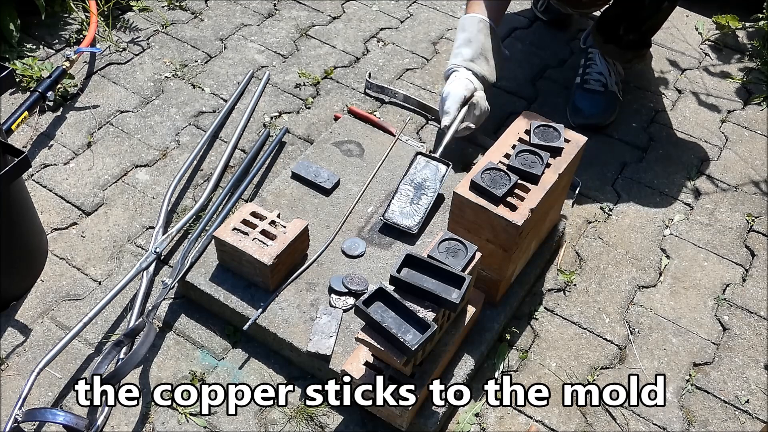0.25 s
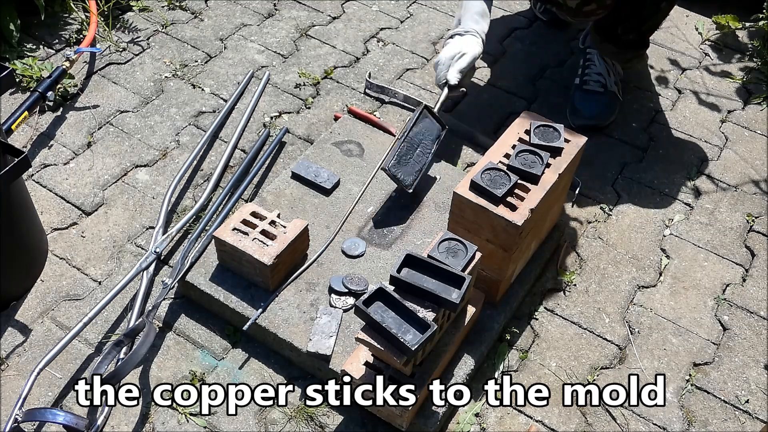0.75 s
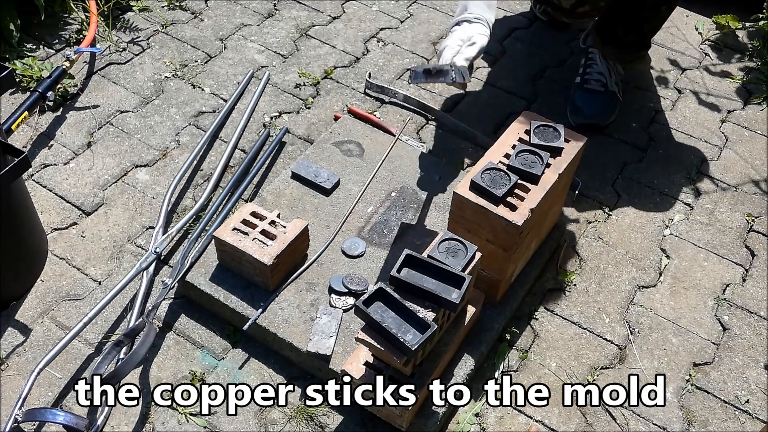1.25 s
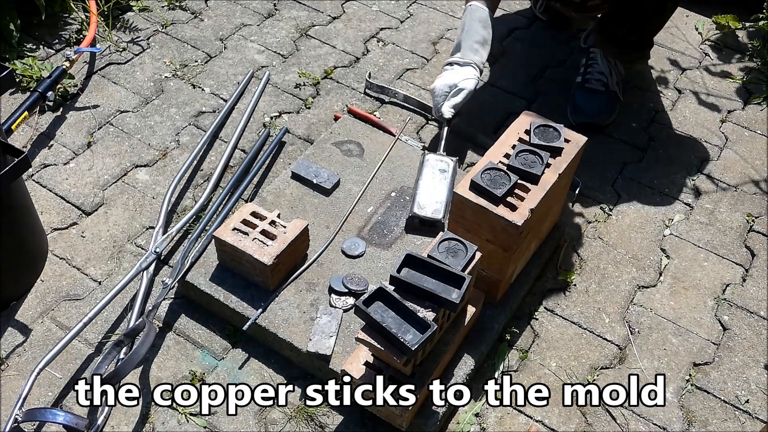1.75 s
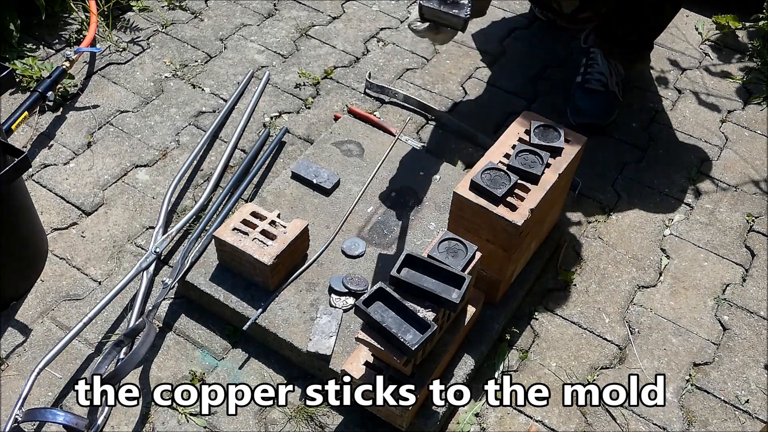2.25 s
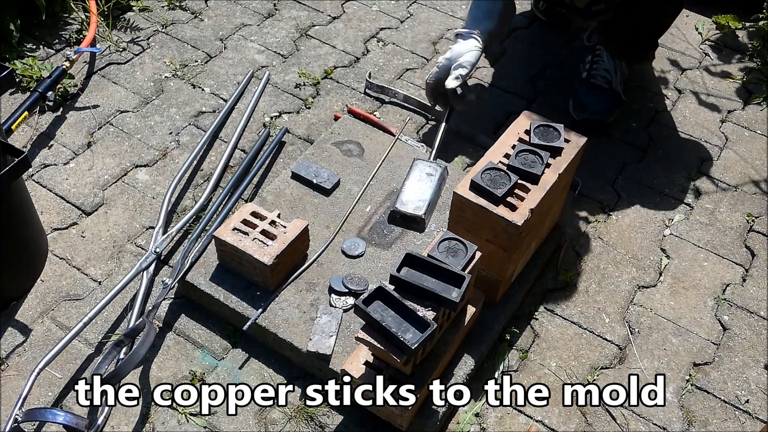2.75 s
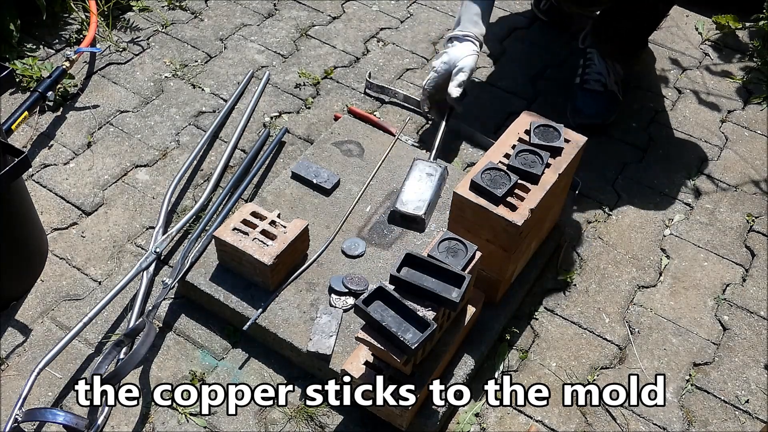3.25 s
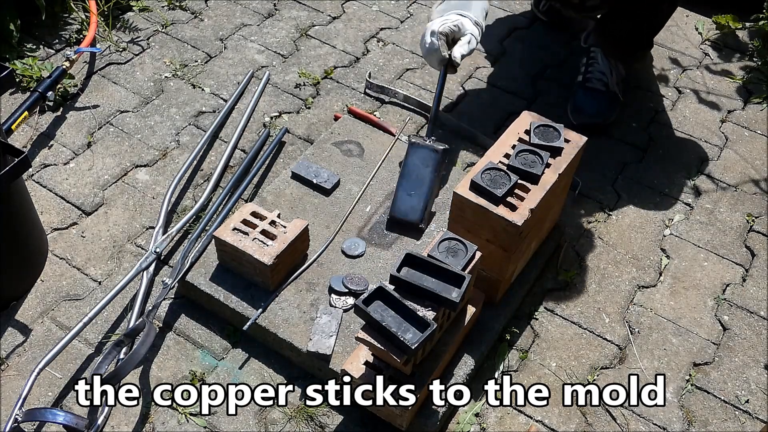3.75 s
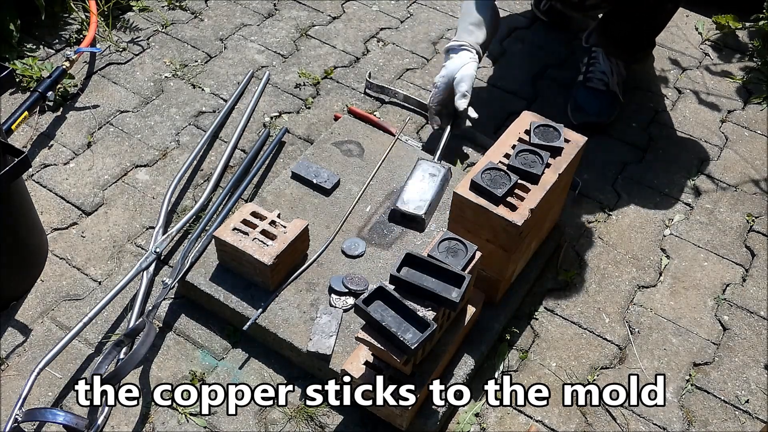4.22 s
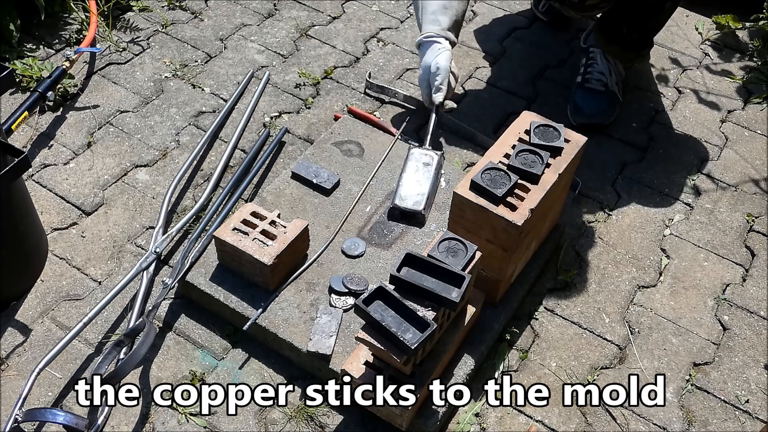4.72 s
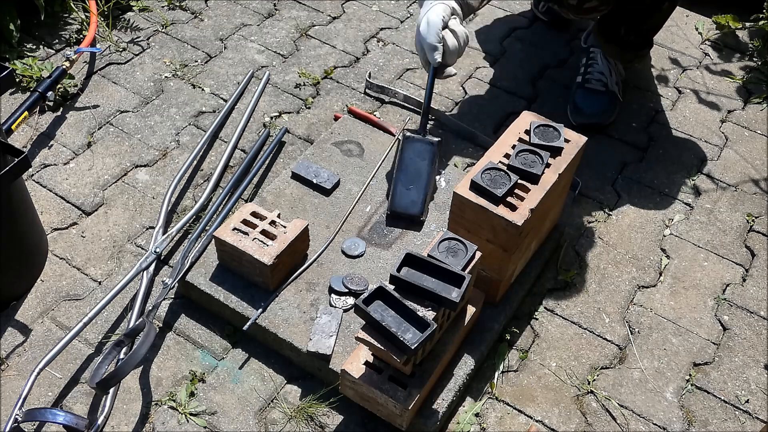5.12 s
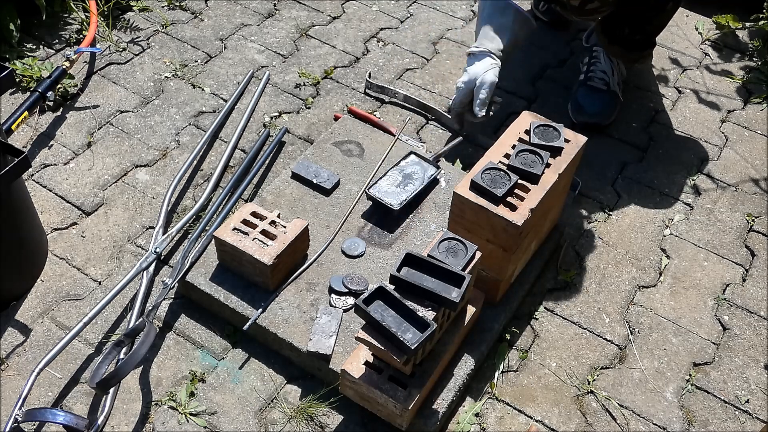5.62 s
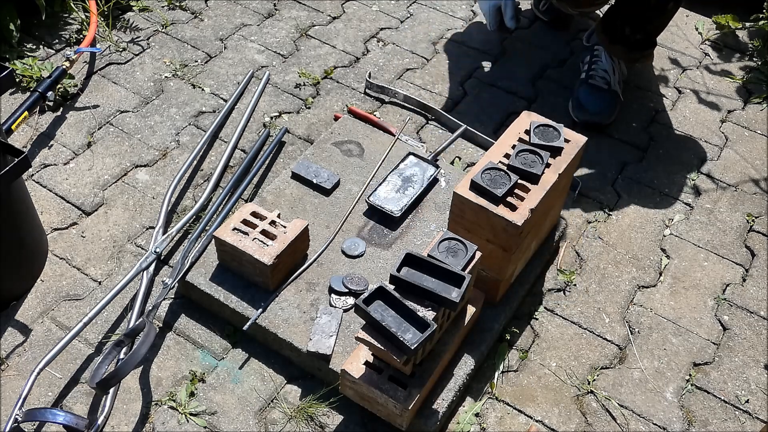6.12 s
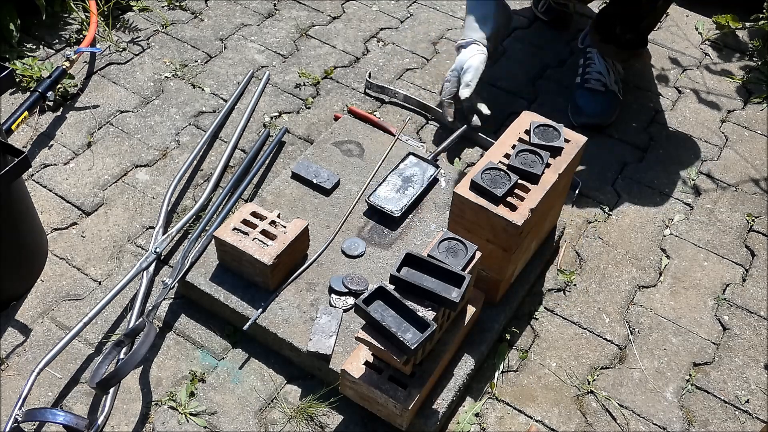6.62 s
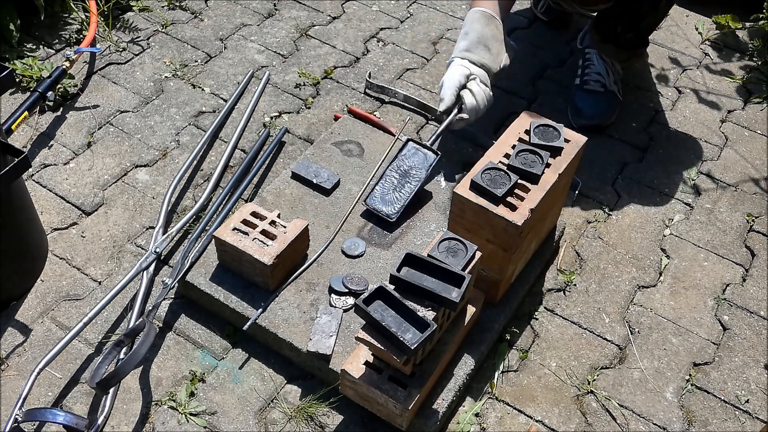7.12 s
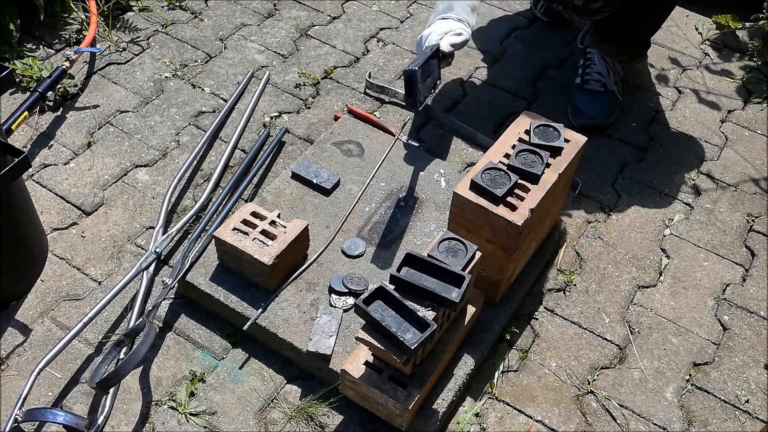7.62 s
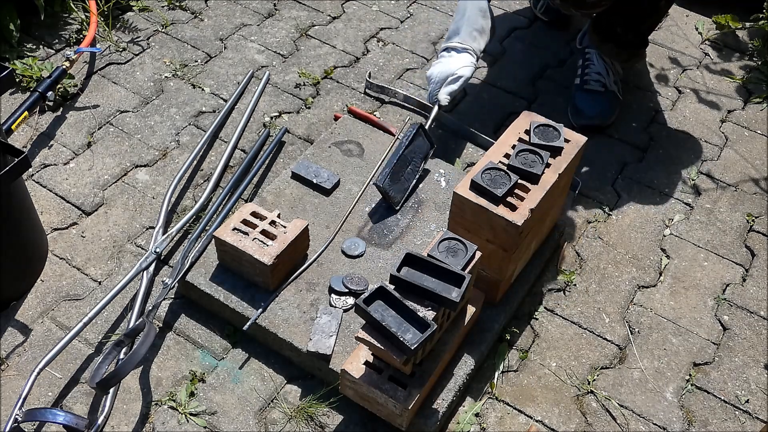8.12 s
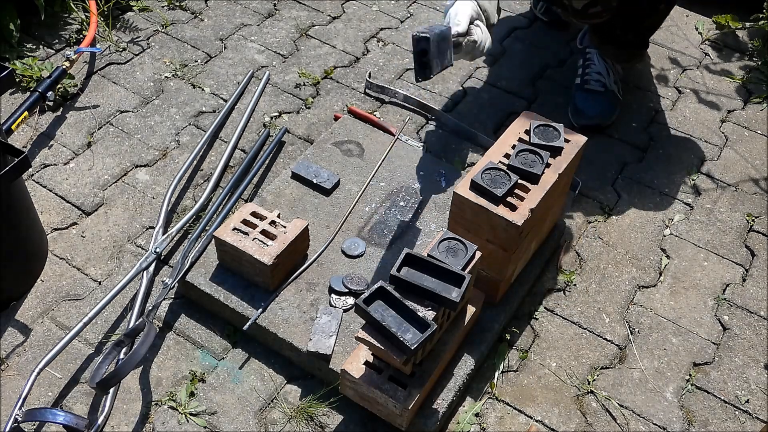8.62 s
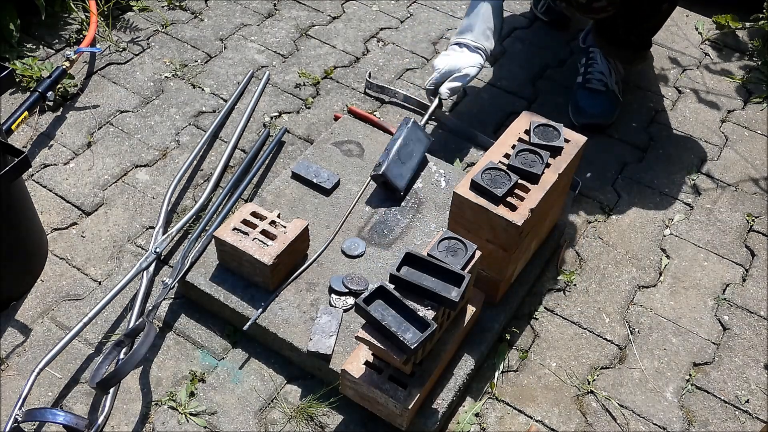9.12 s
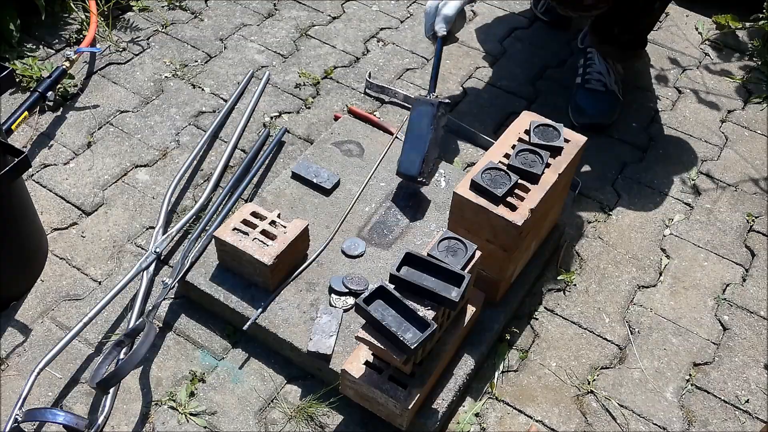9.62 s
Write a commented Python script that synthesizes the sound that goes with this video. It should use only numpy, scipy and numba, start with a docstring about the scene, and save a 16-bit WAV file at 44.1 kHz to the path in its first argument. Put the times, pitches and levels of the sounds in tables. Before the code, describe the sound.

Over the steady roar and hiss of a gas burner outdoors, a steel mould hits concrete three times with hard, quickly fading clanks. A soft scrape and a cluster of lighter knocks follow, then two more heavy slams and a small, high ring as the copper bar inside frees itself. Each hard hit has a brief echo and pushes the overall volume down for a moment before it creeps back.

```python
"""In a paved yard, a gas burner roars into a melting furnace while a steel ingot mould is knocked
and dragged on a concrete slab. The swirling flame makes a low roar, and the gas jet makes a hiss
coloured by the burner tube. Each knock rings the steel; flat landings add a hollow clonk. Near the
end a copper bar comes loose in the mould with a thin, high ring. Hard knocks make an automatic
gain control turn everything down, and the volume then creeps back."""
import sys
import numpy as np
from scipy import signal
from scipy.fft import rfft, irfft, next_fast_len
from scipy.io import wavfile
from scipy.ndimage import minimum_filter1d
from numba import njit

SR = 44100
rng = np.random.default_rng(int(sys.argv[2]) if len(sys.argv) > 2 else 0)


def materialize(psi):
    """Save the field psi as 16-bit PCM at rate SR to the path in sys.argv[1].

    A 1-D psi becomes a single channel; in a 2-D psi each row is a channel.
    """
    bounded = np.clip(np.atleast_2d(psi).T, -1, 1)
    quanta = np.round(bounded * 32767).astype(np.int16)
    wavfile.write(sys.argv[1], SR, quanta)


N = 434826

# How hard the burner runs: time_s, flame_db, jet_db
BURNER_LEVELS = [(0, -26, -45), (2, -26.5, -45), (4, -25.5, -44), (6, -25.5, -44), (8, -26.5, -44.5),
                 (8.8, -25, -44.5), (9.4, -29, -47), (9.86, -27, -46.5)]
# Tone of the flame's roar and of the jet's hiss: pitch_hz, relative_db
FLAME_TONE = [(25, -21.5), (55, -30), (100, -10.5), (140, 0.5), (200, -4.5), (380, -5), (500, -10),
              (700, -26), (1100, -28), (1400, -38.5), (2000, -57.5)]
JET_TONE = [(900, -11), (1800, -11.5), (2400, -2.5), (3500, -6.5), (4400, -14.5), (5600, -10.5),
            (7000, -10.5), (7700, -24), (8400, -8.5), (11500, -11), (13000, -22), (15200, -69),
            (15800, -46)]
# Peaks and dips in the flame's roar from sound reflecting off the ground: pitch_hz, width_hz, gain_db
GROUND_REFLECTION_PEAKS = [(231.5, 9.1, -16.5), (245.6, 20, 5.5), (278.5, 29, -7.5), (714, 15.3, -12),
                           (741.4, 31.5, 9), (1487, 60, 16)]
# Peaks and dips the burner tube adds to the hiss: pitch_hz, width_hz, gain_db
TUBE_PEAKS = [(2174, 162, 14), (2596, 178, 13.5), (2835, 153, -6), (3100, 150, 11.5), (3754, 176, 11),
              (4630, 6.8, 19.5), (5326, 310, 7), (5870, 88, 10.5), (6340, 200, 7.5), (8860, 350, 3.5),
              (9600, 110, 6.5), (12600, 200, -2), (13500, 250, 6), (14000, 300, -29)]
# How much louder the burner is on the left: pitch_hz, gain_db
LEFT_LOUDER = [(60, 1), (130, -0.5), (290, 1), (640, 3), (1410, 4), (3100, 4), (6820, -0.5), (15000, 1.5)]
# How far the burner's wave is ahead on the left: pitch_hz, phase_radians
LEFT_AHEAD = [(0, -0.37), (600, 0.44), (2930, -0.52), (4050, 0.2), (9820, 0.015), (11800, -0.8),
              (12500, -0.1), (16100, -0.1)]
# Scattered burner sound beside the direct sound: pitch_hz, relative_db
SCATTERED_SHARE = [(30, -10), (80, -45), (300, -33), (1000, -8), (3000, -11.5), (8000, -9.5), (15000, -7.5)]

# The mould scraping over the slab: start_s, end_s, level_db, pitch_hz
MOULD_DRAGS = [(0.594, .72, -52, 1640), (4.692, 4.9, -30.5, 1540), (5.156, 5.257, -33.5, 1000)]
# The mould hitting the slab. Slams land on one end, then the other, then bounce; turning it gives
# light taps. Where it lands favours two pitches; how it is held changes the length of the ring.
# start_s, blow_db, pitch_hz, second_hz, second_db, focus_db_per_octave, ring_scale,
# crack_db, clonk_db, clonk_hz (second_db, crack_db and clonk_db are added to blow_db)
MOULD_KNOCKS = [(.612, -30, 1570, 2560, -9, 40, 1.1, -25, -30, 850),
                (.641, -31, 1740, 1285, -2, 40, 0.57, -22, -30, 850),
                (0.695, -30, 1580, 2580, -3, 45, 1.1, -25, -30, 850),
                (1.4061, 3, 2340, 1075, -2.5, 60, .9, -9.5, 2, 885),
                (1.4153, 14, 1330, 2090, -6, 40, 0.47, -13, -5, 900),
                (1.416, 5, 5540, 3200, -3, 40, 0.72, -16, -30, 900),
                (1.4654, -17, 2025, 1230, 4, 40, 0.54, -9, 8, 880),
                (2.4974, 3, 2180, 3130, 5, 77, 0.4, -7.5, -2.5, 810),
                (2.4997, 8, 2110, 5050, 0, 68, 0.47, -11.5, -1, 820),
                (2.579, -14, 1940, 2340, -4, 40, 0.28, -15, -25, 850),
                (3.9643, -4, 2500, 5280, -1, 51, 0.68, -16, -28, 820),
                (3.9645, -3, 1540, 1360, -4, 45, 0.61, -32, -25, 810),
                (3.9662, -6, 2060, 2600, -13, 55, .45, -25, 4.5, 804),
                (4.0432, -13.5, 1040, 1330, -3, 45, 0.66, -20, 0, 924),
                (4.739, -21.5, 1560, 1580, -7, 65, 1.1, -35, -32, 850),
                (5.157, -32, 1040, 1580, -8, 23, 0.51, -11, -3, 850),
                (5.256, -28.5, 1510, 2200, -3, 30, 0.55, -6, 13, 820),
                (5.4304, -15.5, 1030, 1400, -4, 47, 0.9, -17, -6, 850),
                (5.5885, -18.5, 1290, 2170, -2, 45, 0.58, -8.5, -20, 850),
                (5.6296, -13.5, 1280, 2260, -5.5, 50, 0.93, -6.5, 2.5, 740),
                (5.631, -13, 5270, 2450, 3, 52, 0.69, -14, -30, 850),
                (5.732, -9.5, 1280, 2030, -9, 61, 0.66, -15.5, -9, 914),
                (5.8072, -15, 1280, 2230, -12, 62, 0.88, -12, 3, 810),
                (5.847, -36, 2200, 1320, 5, 26, 0.52, -3, -16, 860),
                (7.298, -19, 1472, 2480, -12, 150, 1.1, -26, -30, 850),
                (7.328, -18.5, 1540, 1130, -2, 37, 0.45, -25, -24, 790),
                (7.9051, 3.5, 1060, 2140, -9, 51, 0.77, -13, 7, 870),
                (7.9099, 2.5, 1230, 2200, -4, 47, 0.38, -14, 7, 844),
                (7.963, -23, 1040, 1230, -3, 30, .6, -10, 11, 880),
                (8.857, 1.5, 1110, 5000, -8, 48, 0.79, -8, 6, 874),
                (8.8595, 0, 2090, 1230, 2, 55, 0.55, -22, -2, 820),
                (8.885, -16, 1230, 2430, -6, 20, .6, -12, -1, 850),
                (8.902, -8, 2690, 4300, -24, 120, 1.3, -40, -40, 850),
                (8.9495, -19.5, 1030, 2210, -16, 23, 1, -8.5, 4, 860),
                (9.2796, -7.5, 1440, 3740, -1, 35, 0.23, -11, -53, 850),
                (9.307, -28, 1500, 4400, 6, 28, .4, -3, -20, 850),
                (9.318, -31, 1500, 4300, 0, 20, 0.37, -8, -20, 850)]
# The steel mould's ringing notes: pitch_hz, level_db, ring_s (before ring_scale)
MOULD_NOTES = [(1040, 13.5, 0.014), (1150, -14, 0.028), (1168, 1, 0.036), (1275, 3, 0.08), (1380, 5, 0.035),
               (1460, -10, 0.024), (1474, -0.5, 0.061), (1543, -3.5, 0.067), (1740, 5, 0.04),
               (1900, 6.5, 0.046), (2015, 5, 0.059), (2140, 0, 0.14), (2208, 5.5, 0.044),
               (2264, -12.5, 0.036), (2414, 1.5, 0.051), (2530, 3, 0.052), (2640, -9, 0.17),
               (2850, -2, 0.017), (2950, 4, 0.023), (3250, 6, 0.029), (3540, 1, 0.023), (4130, -5, 0.048),
               (4940, 2, 0.026), (5130, 7, 0.026), (6200, -12, 0.013), (6800, -18, .012)]
# The hollow clonk of a flat landing: multiple_of_clonk_hz, level_db, ring_s (before ring_scale)
CLONK_NOTES = [(.77, -10, 0.024), (1, -2.5, 0.028)]
# Tone of a knock's crack and of its tail in the yard: pitch_hz, relative_db
CRACK_TONE = [(600, -10), (1200, 8), (2400, 11), (3600, 7), (5200, 5), (7500, -1), (10000, -3),
              (16000, -27)]
YARD_TONE = [(500, -31), (1500, 15), (2600, 8), (5000, 1.5), (9000, -7), (12000, -10), (16000, -24)]

# The copper bar coming loose, one row: lift_s, land_s, ring_db, rattle_db
BAR_LIFT = (9.2825, 9.308, -27, -31)
# The bar's ringing notes: pitch_hz, level_db, ring_s (before ring_scale)
BAR_NOTES = [(9082, -8, .04), (9812, -5, .3), (10148, -5, .1), (11297, 0, .16), (11979, -3, .16),
             (13155, -5, .16), (13771, -4, .16), (15597, -8, .14)]
# Tone of the bar chattering in the mould: pitch_hz, relative_db
RATTLE_TONE = [(1000, -24), (2500, -12), (6000, -3), (11000, 0), (16000, -8)]


def from_db(db):
    """Turn decibels into a number to multiply by."""
    return 10 ** (np.asarray(db) / 20)


def rms_one(x):
    """Scale a signal to an average strength of 1."""
    return x / np.sqrt(np.mean(x ** 2) + 1e-20)


def at_hz(points, hz):
    """Read between a table's rows at the given pitches."""
    points = np.array(points, float)
    return np.interp(np.log(hz), np.log(points[:, 0] + 1), points[:, 1])


def drift(rate_hz):
    """A smooth random wander, about 1 in size; a higher rate moves faster."""
    step = 40   # samples per random value
    pole = np.exp(-2 * np.pi * rate_hz * step / SR)
    noise = rng.standard_normal(N // step + 2002)
    slow = signal.lfilter([1], [1, -2 * pole, pole * pole], noise)[2000:]
    return np.interp(np.arange(N) / step, np.arange(len(slow)), rms_one(slow))


def colour(x, tone, peaks=()):
    """Shape a sound with a tone curve plus rounded peaks and dips."""
    size = next_fast_len(len(x))
    hz = np.arange(1, size // 2 + 2) * SR / size
    peaks_db = sum(db / (1 + (2 * (hz - pitch) / width) ** 2) for pitch, width, db in peaks)
    return irfft(rfft(x, size) * from_db(at_hz(tone, hz) + peaks_db), size)[:len(x)]


def swirling_gas(tone, peaks, flutter_db):
    """Noise that flutters as the gas swirls, in a direct and a scattered version."""
    flutter = from_db(flutter_db)
    direct, scattered = (colour(rng.standard_normal(N) * flutter, tone, peaks) for _ in range(2))
    return np.array([direct, scattered]) / np.std(direct)


def burner():
    """The flame roars and the jet hisses, a little to the left; the same slow gusts sway both."""
    time_s, flame_db, jet_db = np.transpose(BURNER_LEVELS)
    t, gust = np.arange(N) / SR, drift(0.75)
    flame = swirling_gas(FLAME_TONE, GROUND_REFLECTION_PEAKS, flutter_db=0.48 * gust + drift(26.5))
    flame *= from_db(np.interp(t, time_s, flame_db))
    flame[0] -= 0.17 * (flame[0] ** 2 - np.mean(flame[0] ** 2))   # troughs get sharper than crests
    jet = swirling_gas(JET_TONE, TUBE_PEAKS, flutter_db=0.6 * (0.7 * gust + drift(30.0)))
    jet *= from_db(np.interp(t, time_s, jet_db))
    size = next_fast_len(N)
    hz = np.arange(1, size // 2 + 2) * SR / size
    direct, scattered = rfft(flame + jet, size)
    scattered *= from_db(at_hz(SCATTERED_SHARE, hz))
    # Each side takes half of the left-right gap in level and phase.
    lean = from_db(at_hz(LEFT_LOUDER, hz) / 2) * np.exp(.5j * at_hz(LEFT_AHEAD, hz))
    return irfft([(direct + scattered) * lean, (direct - scattered) / lean], size)[:, :N]


def drags(bumps=14):
    """Each scrape is a string of small, uneven bumps, given as rows like MOULD_KNOCKS."""
    rows = []
    for start_s, end_s, level_db, pitch_hz in MOULD_DRAGS:
        for when, size in rng.random((bumps, 2)):
            time_s = start_s + when * (end_s - start_s)
            blow_db = level_db + 12 * (size - .5)
            rows.append((time_s, blow_db, pitch_hz, pitch_hz, 0, 60, .8, -16, -30, 850))
    return rows


def struck(starts, strength_db, notes, rise_s, ring_scale=0.86, pitch_scale=1):
    """Blows make notes swell as the force builds, then fade 60 dB in ring_s times ring_scale."""
    pitch, level_db, ring_s = np.transpose(notes)[:, :, None]
    t, out = np.arange(SR // 4) / SR, np.zeros(N + SR)
    gains = from_db(strength_db + level_db[:, 0])
    per_blow = np.ones((len(starts), 1))
    for start, gain, length, tune in zip(starts, gains, ring_scale * per_blow, pitch_scale * per_blow):
        swell = from_db(-60 * t / (length * ring_s)) - from_db(-60 * t / rise_s)
        out[start:start + len(t)] += gain @ (np.sin(2 * np.pi * tune * pitch * t) * swell)
    return out[:N]


def fading(starts, level_db, fade_s):
    """A level that jumps at each start sample, then falls to about a third every fade_s."""
    clicks = np.zeros(N)
    clicks[starts] = from_db(level_db).ravel()
    return signal.lfilter([1], [1, -np.exp(-1 / (fade_s * SR))], clicks + 1e-18)


def mould(crack_s=0.0022):
    """Steel hits concrete with a ring, a clonk and a gritty crack; also returns the tail in the yard."""
    hits = np.vstack([MOULD_KNOCKS, drags()])
    (start_s, blow_db, pitch_hz, second_hz, second_db, focus, ring_scale,
     crack_db, clonk_db, clonk_hz) = hits.T[:, :, None]
    starts = np.round(start_s[:, 0] * SR).astype(int)
    # Notes near the two favoured pitches ring loudest.
    note_hz = np.array(MOULD_NOTES)[:, 0]
    favour_db = np.maximum(-focus * np.abs(np.log2(note_hz / pitch_hz)),
                           second_db - focus * np.abs(np.log2(note_hz / second_hz)))
    strength_db = blow_db - 9.0 + favour_db + rng.normal(0, 0.54, favour_db.shape)
    ring = struck(starts, strength_db, MOULD_NOTES, rise_s=0.0045, ring_scale=ring_scale)
    clonk = struck(starts, blow_db + clonk_db, CLONK_NOTES, rise_s=0.0069, pitch_scale=clonk_hz)
    grit_db = blow_db + crack_db
    crack_shape = fading(starts, grit_db, crack_s) - fading(starts, grit_db, crack_s / 4)
    crack_shape += fading(starts, grit_db - 15, fade_s=0.013)
    crack = rms_one(colour(rng.standard_normal(N), CRACK_TONE)) * crack_shape
    yard_noise = np.array([rms_one(colour(rng.standard_normal(N), YARD_TONE)) for _ in range(2)])
    return ring + clonk + crack, yard_noise * fading(starts, blow_db - 32, fade_s=0.029)


def yard_echoes(x, loss_db_per_s=350):
    """A few quick echoes bounce off bricks and walls, different ones on each side."""
    out = np.zeros((2, N))
    delays_s = rng.uniform(0.0022, .03, 12)
    for k, lag in enumerate((delays_s * SR).astype(int)):
        out[k % 2, lag:] += from_db(-loss_db_per_s * lag / SR) * x[:-lag] * (-1) ** (k // 2)
    return out


def copper_bar(damping_s=.006, wobble_db=1.5):
    """The freed bar rings high, thin and unsteady over its own rattle; landing stops the ring."""
    lift_s, land_s, ring_db, rattle_db = BAR_LIFT
    starts = [round(lift_s * SR)]
    ring = struck(starts, np.array([[ring_db]]), BAR_NOTES, rise_s=0.003)
    ring *= from_db(wobble_db * drift(98.0))
    rattle = rms_one(colour(rng.standard_normal(N), RATTLE_TONE))
    rattle *= fading(starts, rattle_db, fade_s=0.018)
    since_landing_s = np.maximum(np.arange(N) / SR - land_s, 0)
    return ring * np.exp(-since_landing_s / damping_s) + rattle


def scene():
    """Burner and bar sit a little to the left, the knocks slightly to the right."""
    knocks, yard_tail = mould()
    clink = copper_bar()
    metal = knocks * from_db([[-.6], [.6]]) + clink * from_db([[1.2], [-1.2]])
    return burner() + metal + from_db(-22.0) * yard_echoes(knocks + clink) + yard_tail


@njit
def gain_cut(over_db, attack_s=0.0014, hold_s=0.024, release_s=0.18, release_db_per_s=35,
             slow_s=0.37, slow_share=0.25):
    """How many dB to turn down: the cut grows fast, holds, then eases off, part of it more slowly."""
    cut_db, quick, slow, wait = np.zeros(len(over_db)), 0., 0., 0.
    for i in range(len(over_db)):
        if over_db[i] > quick:
            quick += (over_db[i] - quick) / (attack_s * SR)
            wait = hold_s * SR
        elif wait > 0:
            wait -= 1
        else:
            quick = max(quick - (quick / release_s + release_db_per_s) / SR, 0.)
        slow = max(slow * (1 - 1 / (slow_s * SR)), slow_share * quick)
        cut_db[i] = (1 - slow_share) * quick + slow
    return cut_db


def record(dry, threshold_db=-12, ceiling=.56, bass_hz=70, treble_hz=16100):
    """Turn loud peaks down, round off what slips past, and trim the deepest bass and highest treble."""
    sensed = dry + np.diff(dry, prepend=0)   # bright sounds trigger the gain control most
    swing = np.abs(sensed).max(axis=0)
    peak = -minimum_filter1d(-swing, size=89, origin=44)   # biggest swing of the last 2 ms
    over_db = np.maximum(20 * np.log10(peak + 1e-9) - threshold_db, 0)
    ducked = dry * from_db(-gain_cut(over_db))
    rounded = ceiling * np.tanh(ducked / ceiling)
    bass_trimmed = signal.sosfilt(signal.butter(2, bass_hz, "high", fs=SR, output="sos"), rounded)
    return signal.sosfilt(signal.cheby2(24, 60, treble_hz, fs=SR, output="sos"), bass_trimmed)


dry = scene()
out = record(dry)
materialize(out)
```